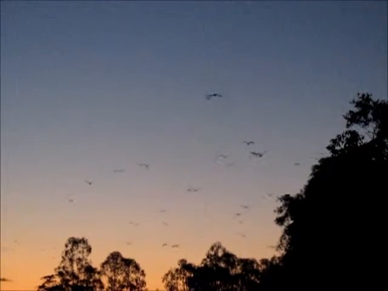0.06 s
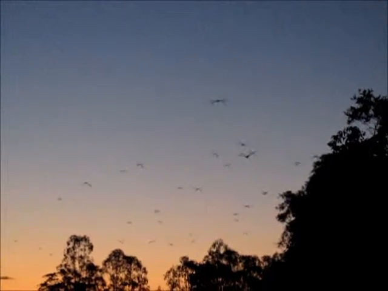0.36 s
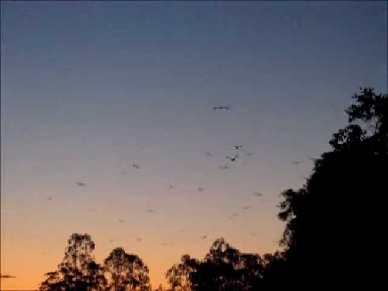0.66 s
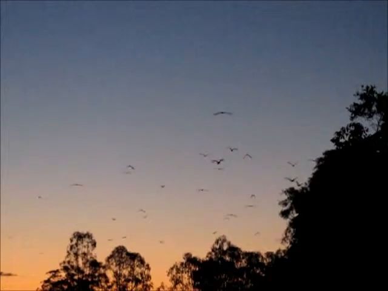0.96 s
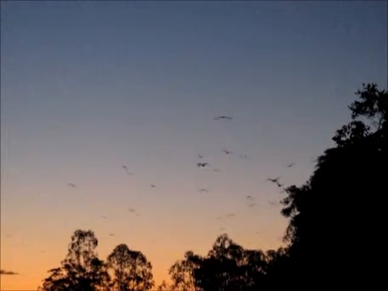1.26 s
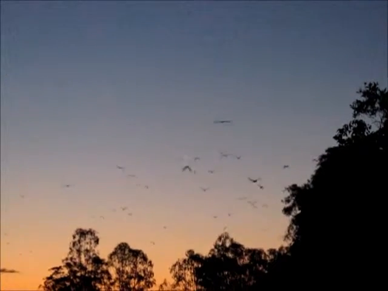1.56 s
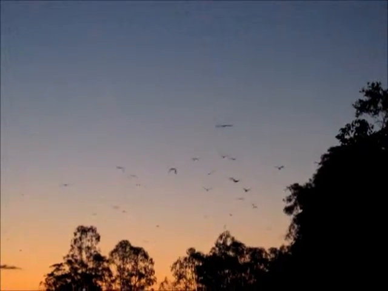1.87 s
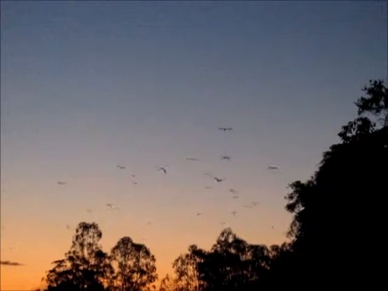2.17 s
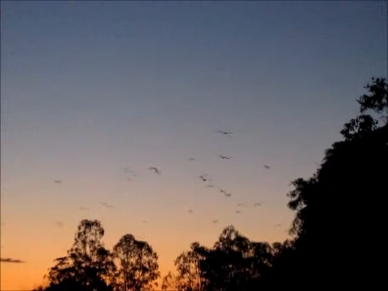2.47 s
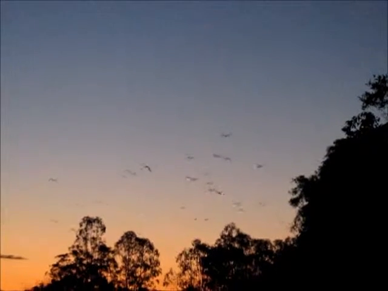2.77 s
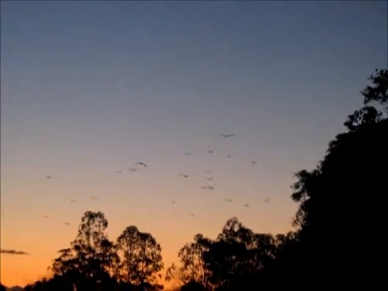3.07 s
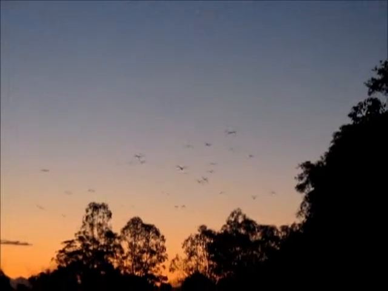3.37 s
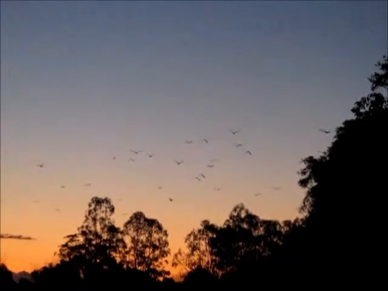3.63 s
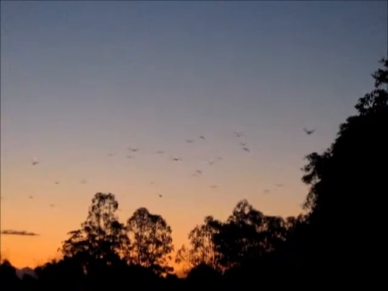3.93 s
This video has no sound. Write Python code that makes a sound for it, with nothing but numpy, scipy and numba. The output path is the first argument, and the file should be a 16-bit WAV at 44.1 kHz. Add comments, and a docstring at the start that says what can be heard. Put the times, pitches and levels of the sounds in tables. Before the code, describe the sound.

Bats call from trees to the right, starting faintly. From about 0.6 seconds, short raspy screeches and thin squeals come close by, with the colony chattering farther back. From about 2.3 seconds the calls crowd together and grow louder and shriller, staying busy until 4 seconds. A few faint dry ticks fall in the first 1.3 seconds. A distant rumble, open air and a faint hum swell underneath.

```python
"""Flying foxes at dusk, roosting in trees to the right of a small stereo microphone.
The nearest bats screech (rough throat pulses through two gliding resonances), squeal and yelp.
Farther back the whole colony squabbles and swells, and trunks and leaves scatter the calls.
A few faint dry ticks sound close by; under it all lie a far rumble, open air and a faint hum."""
import sys
import numpy as np
from scipy import signal
from scipy.fft import rfft, irfft
from scipy.io import wavfile
from scipy.ndimage import uniform_filter1d
from numba import njit

SR = 44100
rng = np.random.default_rng(int(sys.argv[2]) if len(sys.argv) > 2 else 0)


def generate_wav(sig):
    """Save sig (samples, or channels by samples) to the path in sys.argv[1] as 16-bit PCM at SR."""
    pcm = np.round(np.clip(np.atleast_2d(sig).T, -1, 1) * 32767).astype(np.int16)
    wavfile.write(sys.argv[1], SR, pcm)


N = 176400
T = np.arange(N) / SR

# Near screeches, each with a lower and an upper throat resonance: start_s, length_s, pitch_hz,
# lower_hz, lower_glide_octaves, lower_db, upper_hz, upper_glide_octaves, upper_db, roughness
NEAR_SCREECHES = [ (0.632, 0.15, 521, 2920, -0.035, -58, 6600, -0.021, -58, 0.54),
                  (0.753, 0.072, 435.3, 2710, -0.0041, -52, 4460, -.2, -56, 0.63),
                  (0.819, .055, 450, 2850, 0.02, -50.5, 3470, 0.076, -51.5, .6),
                  (1.044, .06, 481, 2800, -0.063, -55, 3260, 0, -73, 0.65),
                  (1.32, 0.055, 448, 2650, 0.036, -56, 6000, -0.18, -58, 0.72),
                  (1.428, 0.048, 721, 2880, 0.17, -54.5, 3640, .15, -58, 0.38),
                  (1.75, 0.072, 452, 2620, 0.053, -54, 6400, 0.03, -60.5, 0.77),
                  (2.06, 0.11, 706, 2710, 0.0097, -56, 5770, -0.04, -60, 0.58),
                  (2.21, 0.082, 411, 2570, 0.21, -57, 4650, 0.1, -57, 0.26),
                  (2.302, 0.097, 518, 2950, 0.078, -49.5, 3850, -0.3, -52, .42),
                  (2.395, 0.09, 489.5, 2970, -0.15, -47.5, 3900, 0, -72, 0.71),
                  (2.467, 0.085, 492, 2890, 0.073, -43.5, 4160, .15, -61, 0.36),
                  (2.571, 0.12, 481, 2560, -.25, -50.5, 5670, -0.034, -65, 0.51),
                  (2.695, 0.092, 617, 2700, 0.011, -49, 4170, -0.11, -48.5, 0.4),
                  (2.757, .13, 514.5, 2580, 0.012, -45.5, 5170, -0.086, -48, 0.34),
                  (2.882, 0.062, 459, 2730, -0.023, -48, 4440, -0.041, -53, 0.74),
                  (3.014, .058, 439, 2470, -0.11, -43, 4520, -0.12, -44.5, 0.38),
                  (3.114, 0.0913, 555, 2650, 0.092, -45, 3700, -0.05, -50, 0.46),
                  (3.418, 0.076, 484.6, 2470, -0.247, -45.5, 6600, -.05, -54, 0.27),
                  (3.5, 0.16, 466, 2790, 0.016, -50, 6150, -.2, -53.5, 0.6),
                  (3.503, 0.15, 913, 2720, .06, -47.5, 3600, 0.073, -53, .22),
                  (3.651, 0.065, 468, 2800, 0.033, -40.5, 7570, 0.062, -47.5, 0.62),
                  (3.717, 0.078, 477, 3020, 0.064, -51, 4240, .25, -51, 0.72),
                  (3.78, 0.096, 481.6, 2620, 0.059, -47.5, 5170, 0.074, -53, .6)]
# Near squeals and yelps:
# start_s, length_s, first_hz, middle_hz, last_hz, level_db, second_harmonic_db, roughness
NEAR_SQUEALS = [ (.33, 0.21, 2200, 2120, 2123, -64.5, -28, 0.4),
                (0.579, 0.016, 2700, 2660, 2680, -53, -23, 0.7),
                (0.618, .022, 2520, 2576, 2580, -44, -35, 0.32),
                (0.649, 0.19, 2600, 2558, 2555, -53.5, -26, 0.23),
                (0.919, 0.051, 1207, 1130, 1200, -59.5, -20, 1),
                (1.666, 0.12, 2050, 1855, 1886, -56, -12, 0.38),
                (1.812, 0.073, 1855, 1920, 1946, -54, -13, 0.26),
                (1.905, .12, 1964, 2020, 1984, -52, -26, 0.26),
                (1.872, 0.088, 4180, 4000, 4130, -58, -5, 0.1),
                (1.905, 0.072, 4720, 4880, 4930, -64, -20, 0.23),
                (2.033, 0.056, 1333, 1162, 1100, -46.5, -29, 1.13),
                (2.439, 0.071, 2410, 2430, 2430, -50, -25, 0.22),
                (3.002, 0.054, 3540, 3557, 3540, -45, -25, 0.24),
                (3.078, 0.058, 3990, 3920, 3970, -47.5, -26, 0.2),
                (3.095, 0.083, 2570, 2720, 2820, -43, -16, 0.28),
                (3.655, 0.039, 3660, 3590, 3500, -43.5, -25, 0.5)]
# Swell of the colony farther back: time_s, throaty_db, shrill_db
ROOST_LEVELS = [(0, -69, -78.5), (.2, -65.5, -70), (.6, -64, -73), (.68, -55, -59), (.95, -56.5, -61),
                (1.22, -57, -73), (1.42, -57.5, -62), (1.68, -56.5, -66), (2.05, -59, -56),
                (2.3, -49.5, -56), (2.55, -50, -48.5), (2.88, -49.5, -45), (2.98, -44.5, -53.5),
                (3.3, -49.5, -46.5), (3.62, -49, -45.5), (3.84, -52, -48.5), (4, -48, -60.5)]
# Hiss at the top of the colony's voices: time_s, level_db
ROOST_HISS_LEVELS = [(0, -74.5), (.5, -74.5), (.68, -68.5), (.95, -67.5), (1.3, -68), (1.65, -67.5),
                     (1.9, -61.5), (2.07, -55.5), (2.17, -57.5), (2.21, -65), (2.35, -63), (2.52, -53),
                     (2.93, -54.5), (2.98, -61), (3.1, -64), (3.16, -57), (3.62, -49.5), (3.8, -55.5),
                     (4, -64)]
# Spectra of the colony's throaty, shrill and hiss bands, one list each: frequency_hz, gain_db
ROOST_SPECTRA = [
    [(1500, -38), (2000, -5.5), (2600, -4), (3100, -6.5), (4600, -21.5), (6000, -48)],
    [(3000, -12.5), (4100, -11.5), (5000, -2), (6000, 1), (6800, -2), (7400, 4), (8200, -8), (9500, -52)],
    [(6000, -46), (7700, -14), (8600, 2.5), (9600, 2.5), (11000, -2), (13300, -11), (15500, -49)],
]
# Ticks close to the microphone: start_s, level_db
CLOSE_TICKS = [(0.201, -61.5), (1.075, -63.5), (1.232, -69)]
# Swell of the distant background: time_s, bass_db, air_db
RUMBLE_LEVELS = [(0, -71.5, -70), (.4, -64.5, -64.5), (.9, -58.5, -58.5), (1.6, -56, -55.5),
                 (2.1, -53, -54), (3.3, -54, -54), (3.9, -52.5, -54)]
# Spectrum of the far rumble: frequency_hz, gain_db
BASS_SPECTRUM = [(20, -7), (35, -10), (55, 2), (125, -0.5), (180, -3.5), (240, -2), (320, -8), (500, -29.5)]
# Spectrum of the open air: frequency_hz, gain_db
AIR_SPECTRUM = [(150, -20), (330, -2), (600, -1.5), (1100, -1.5), (1600, -6), (2200, -12.5), (4000, -18),
                (15000, -26.5)]
# Partials of the hum, before its swell: pitch_hz, level_db
HUM_PARTIALS = [(130, -68), (259.8, -63), (389.5, -75.5)]
# Swell of the hum: time_s, gain_db
HUM_SWELL = [(0, -17), (.7, -2), (1.1, 1), (1.3, -7.5), (4, 4)]
# Response of the microphone's left port: frequency_hz, gain_db
LEFT_RESPONSE = [(3000, 0.5), (4100, -0.5), (5200, 1.5), (7200, 2), (9000, -2.5)]
# Response of its right port: frequency_hz, gain_db
RIGHT_RESPONSE = [(3000, 0.5), (4100, 6.5), (5200, 2), (7200, -5), (9000, 1)]


def screeches(pitch_follow=0.511):
    """Each near bat drives two throat resonances from one larynx; pitch follows the lower one's glide."""
    lower, upper = np.zeros(N), np.zeros(N)
    for start, length, pitch, low_hz, low_glide, low_db, up_hz, up_glide, up_db, rough in NEAR_SCREECHES:
        progress, fade = envelope(length)
        voice = larynx(progress, pitch, rough, pitch_follow * low_glide)
        add(lower, start, fade * undb(low_db) * throat(voice, progress, low_hz, low_glide, width=0.28))
        add(upper, start, fade * undb(up_db) * throat(voice, progress, up_hz, up_glide, width=0.18))
    return place(lower, left_db=-7.5) + place(upper, left_db=-3.5)


def larynx(progress, pitch_hz, rough, glide_octaves, shimmer_db=0.5, rasp=1.32):
    """Uneven pulses on an arching pitch, with a rasp of air once a cycle."""
    n, from_middle = len(progress), progress - .5
    arch = .05 * (np.cos(np.pi * from_middle) - .5)
    waver = .044 * rough * walk(60, n)
    jitter = 0.1261 * rough ** 2 * walk(pitch_hz, n)
    hz = pitch_hz * 2 ** (glide_octaves * from_middle) * (1 + arch + waver + jitter)
    cycles = np.cumsum(hz) / SR
    clicks = np.sinc((cycles % 1 - .5) * SR / hz * .8)  # one band-limited pulse a cycle
    pulses = unit(clicks * undb(shimmer_db * walk(pitch_hz, n)))
    air = unit(rng.standard_normal(n) * (1.3 - np.cos(2 * np.pi * cycles)))
    return (pulses + rasp * rough * air) * flutter(n)


def throat(voice, progress, hz, glide_octaves, width):
    """One steep resonance that slides as the mouth moves."""
    centre_hz = hz * 2 ** (glide_octaves * (progress - .5))
    return unit(resonance(resonance(voice, centre_hz, width), centre_hz, width))


def squeals(jitter=0.102):
    """Near bats squeal in almost pure, trembling tones that bend through three pitches."""
    out = np.zeros(N)
    for start, length, first, middle, last, db, second_db, rough in NEAR_SQUEALS:
        progress, fade = envelope(length, attack_s=0.0035, release_s=0.0075)
        bend_hz = np.polyval(np.polyfit([0, .5, 1], [first, middle, last], 2), progress)
        hz = bend_hz * (1 + jitter * rough * walk(900, len(fade)))
        phase = 2 * np.pi * np.cumsum(hz) / SR
        tone = (np.sin(phase) + undb(second_db) * np.sin(2 * phase)) * flutter(len(fade))
        add(out, start, fade * undb(db) * unit(tone))
    return place(out, left_db=-3.5)


def trees(near, t60_s=0.59, level_db=-8):
    """Trunks and leaves return the near calls as a short diffuse tail, different at each port."""
    t = T[:SR]
    tail = rng.standard_normal((2, SR)) * undb(-60 * t / t60_s) * np.minimum(t / 0.0033, 1)
    tail /= np.sqrt(np.sum(tail ** 2, axis=1, keepdims=True))
    return undb(level_db) * signal.fftconvolve(near[1][None], tail, axes=1)[:, :N]


def roost(left_db=(-1, -2, 9), diffuse=(0.72, 1, 0.97)):
    """The colony's squabble in throaty, shrill and hiss bands, part direct, part scattered by leaves."""
    gains = swell(ROOST_LEVELS, 1), swell(ROOST_LEVELS, 2), swell(ROOST_HISS_LEVELS)
    direct, scattered = crowd(), np.array([crowd(), crowd()])
    chatter = flutter(N, rate_hz=170.5, depth_db=1.25)  # ragged pulsing of the two upper bands
    out = 0
    for k, spectrum in enumerate(ROOST_SPECTRA):
        voices = place(direct, left_db[k]) + diffuse[k] * scattered
        band = np.array([colour(port, spectrum) for port in voices])
        out += unit(band * (chatter if k else 1)) * gains[k]
    return out


def crowd(count=70, spread_db=21):
    """Overlapping, gliding cries of many far bats, smeared by leaves and evened out to a steady level."""
    cries = np.zeros(N)
    for k, (when, long, high, loud, slope) in enumerate(rng.random((count, 5))):
        progress, fade = envelope(.06 + .16 * long)
        cry = larynx(progress, 400 * 2 ** (1.6 * high), rough=.7, glide_octaves=.45 * (2 * slope - 1))
        start = (k + when - 1) / count * N / SR
        add(cries, start, fade * undb(spread_db * loud) * cry)
    leaves = rng.standard_normal(SR // 40) * np.linspace(1, 0, SR // 40)
    smeared = unit(cries) + unit(signal.fftconvolve(cries, leaves)[:N])
    return smeared / np.sqrt(uniform_filter1d(smeared ** 2, SR // 14) + 1e-6)


def ticks(centre_hz=7150., width_hz=7000, decay_s=0.072):
    """Faint dry ticks close by: bursts of bright noise that die away quickly."""
    out, t = np.zeros(N), T[:SR // 5]
    for start, db in CLOSE_TICKS:
        burst = resonance(rng.standard_normal(len(t)), np.full(len(t), centre_hz), width_hz / centre_hz)
        add(out, start, unit(burst) * undb(db) * np.exp(-t / decay_s))
    return out


def rumble():
    """Far rumble and open air: two swelling noises, the air wider in the stereo image."""
    out = 0
    for spectrum, column, width in ((BASS_SPECTRUM, 1, 0.31), (AIR_SPECTRUM, 2, 0.58)):
        mid, side = (unit(colour(rng.standard_normal(N), spectrum + [(SR / 2, -90)])) for _ in range(2))
        out += np.array([mid + width * side, mid - width * side]) * swell(RUMBLE_LEVELS, column)
    return out


def hum(waver_db=3, drift=0.0049):
    """A faint centred hum whose partials waver in level and pitch."""
    out = 0
    for hz, db in HUM_PARTIALS:
        amplitude = np.sqrt(2) * undb(db + waver_db * walk(9))
        phase = 2 * np.pi * np.cumsum(hz * (1 + drift * walk(8))) / SR
        out += amplitude * np.sin(phase)
    return out * swell(HUM_SWELL)


def place(x, left_db, lag_ms=0.14):
    """Sound from the right reaches the left port late; left_db is its level against the right port."""
    late = np.interp(T - lag_ms / 1000, T, x)
    return np.array([late * undb(left_db / 2), x * undb(-left_db / 2)])


def envelope(length_s, attack_s=0.0091, release_s=0.026):
    """Progress 0-1 through a call, and its fade in and out."""
    t = np.arange(int((length_s + release_s) * SR)) / SR
    fade = np.minimum(t / attack_s, 1) * np.clip((length_s + release_s / 2 - t) / release_s, 0, 1)
    return np.minimum(t / length_s, 1), fade


def flutter(size, rate_hz=110.2, depth_db=2):
    """Quick random trembling of a voice's level."""
    return undb(depth_db * walk(rate_hz, size))


def swell(table, column=1):
    """Gain over time from a table's time_s and one of its dB columns."""
    columns = np.array(table).T
    return undb(np.interp(T, columns[0], columns[column]))


@njit
def resonance(x, hz, width):
    """Band-pass with a moving centre; width is a share of the centre frequency."""
    y, band, low = np.empty(len(x)), 0., 0.
    for i in range(len(x)):
        g = np.tan(np.pi * min(hz[i], .45 * SR) / SR)
        v = (band + g * (x[i] - low)) / (1 + g * (g + width))
        band, low, y[i] = 2 * v - band, low + 2 * g * v, width * v
    return y


def colour(x, spectrum):
    """Filter by (frequency_hz, gain_db) points."""
    hz, db = np.array(spectrum, float).T
    bins_hz = np.arange(N // 2 + 1) * SR / N + 1
    return irfft(rfft(x) * undb(np.interp(np.log(bins_hz), np.log(hz), db)), N)


def walk(rate_hz, size=N):
    """Smooth random wander with spread near 1."""
    return np.interp(np.arange(size) / SR * rate_hz, np.arange(8192), rng.standard_normal(8192))


def add(out, start_s, x):
    """Mix a sound in at its time."""
    i = max(int(start_s * SR), 0)
    out[i:i + len(x)] += x[:max(N - i, 0)]


def undb(db):
    """Decibels to amplitude."""
    return 10 ** (np.asarray(db) / 20)


def unit(x):
    """Scale to rms 1."""
    return x / np.sqrt(np.mean(x ** 2) + 1e-20)


def scene():
    """All that reaches the microphone, from the nearest bats to the background."""
    near = screeches() + squeals()
    return near + trees(near) + roost() + ticks() + rumble() + hum()


def record(dry):
    """Each microphone port has its own colour; both share a narrow notch and a steep top cut."""
    notch_hz, notch_width_hz, top_hz = 7890, 320, 15400
    ports = np.array([colour(dry[0], LEFT_RESPONSE), colour(dry[1], RIGHT_RESPONSE)])
    notched = signal.lfilter(*signal.iirnotch(notch_hz, notch_hz / notch_width_hz, fs=SR), ports)
    return signal.sosfilt(signal.ellip(10, .2, 80, top_hz, fs=SR, output="sos"), notched)


dry = scene()
out = record(dry)
generate_wav(out)
```